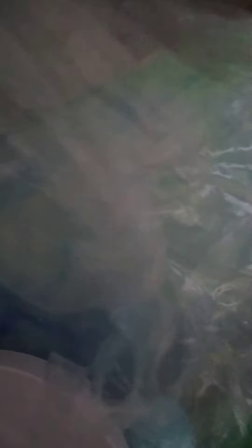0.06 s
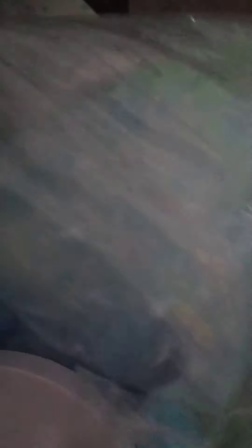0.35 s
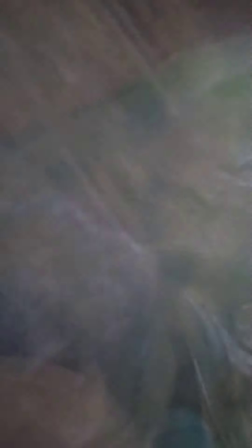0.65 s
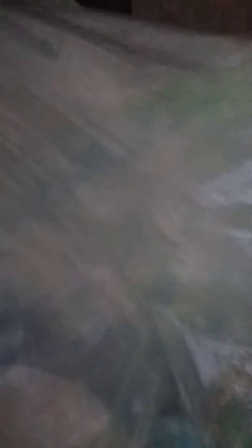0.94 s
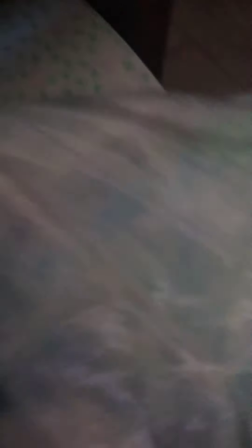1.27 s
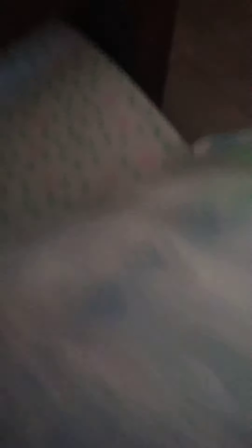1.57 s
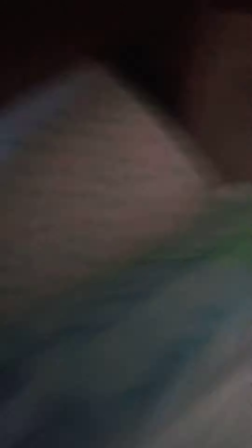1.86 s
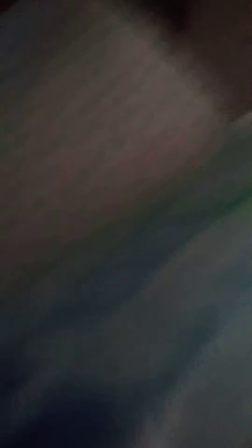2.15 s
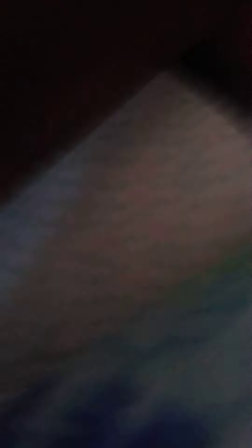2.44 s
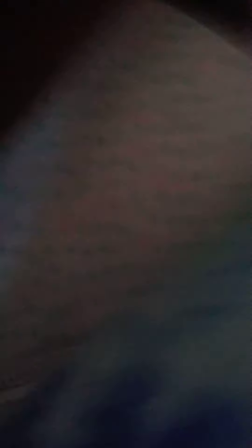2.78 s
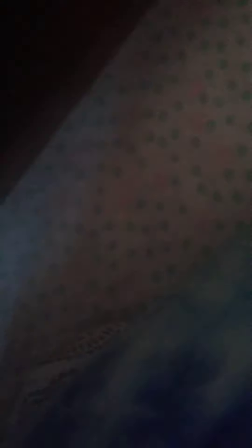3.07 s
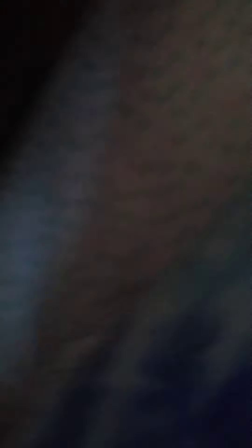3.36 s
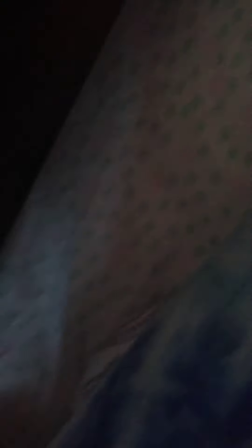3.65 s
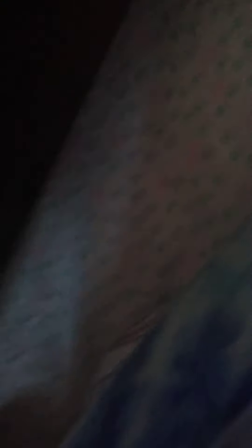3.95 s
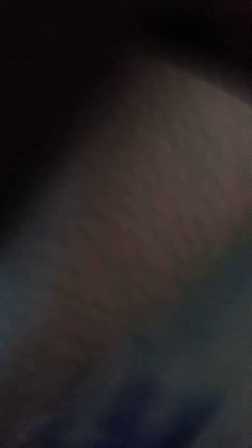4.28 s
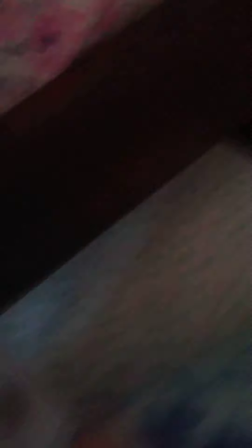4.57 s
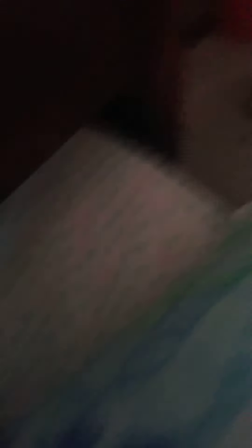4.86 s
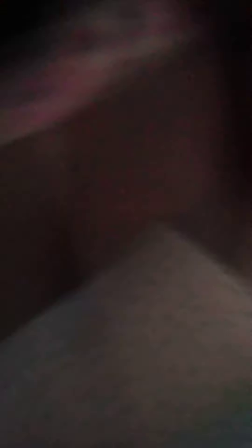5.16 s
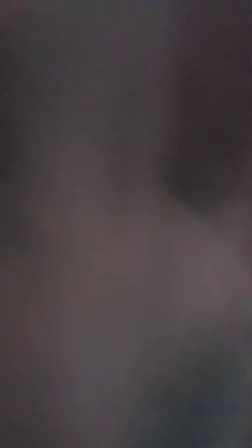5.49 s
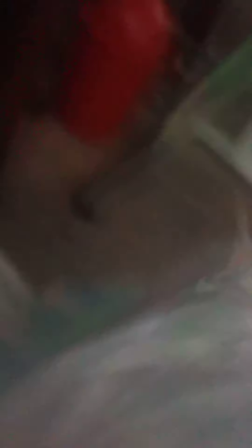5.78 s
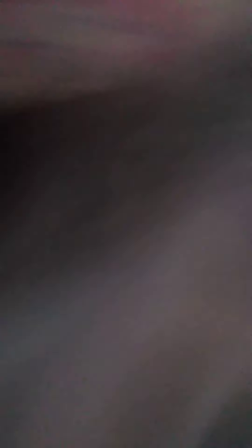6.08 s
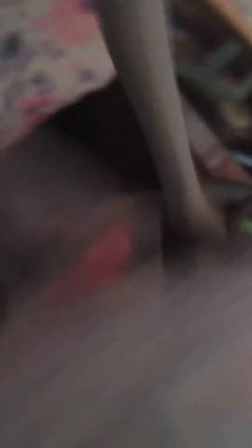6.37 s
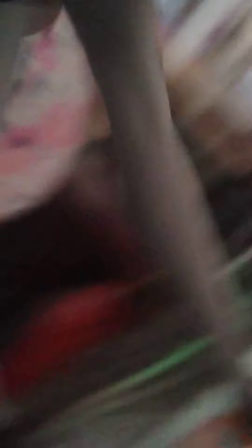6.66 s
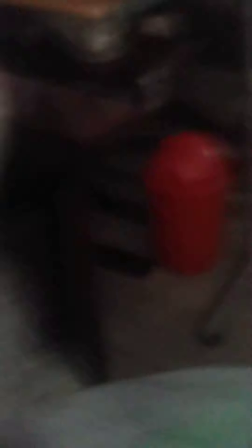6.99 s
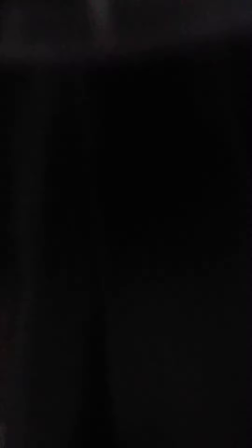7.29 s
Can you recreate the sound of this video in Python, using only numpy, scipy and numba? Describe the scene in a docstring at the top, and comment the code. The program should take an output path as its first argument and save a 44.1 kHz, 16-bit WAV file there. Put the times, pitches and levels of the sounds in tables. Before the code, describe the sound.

Thin plastic wrapping is gathered and squeezed right against a hand-held phone in a small, quiet room. It crinkles in uneven flurries with sharp snaps, while fingers rub and bump the case with low thuds. Midway the handling eases to a few faint ticks, then starts again. A heavy bump and two quick hollow knocks follow, and the plastic dies away to faint rustles.

```python
"""A small furnished room; thin plastic wrapping is gathered and pressed right against a hand-held phone.
Creases buckle in flurries of ticks, the panels between them flap, and film and fingers rub and bump
the case. The handling pauses in the middle and, after two hollow knocks, dies away to faint rustles.
The phone's two microphone ports are widened into stereo, with faint room tone behind."""
import sys
import numpy as np
from scipy import signal
from scipy.fft import rfft, irfft
from scipy.io import wavfile
from scipy.ndimage import uniform_filter1d
from numba import njit

SR = 44100
rng = np.random.default_rng(int(sys.argv[2]) if len(sys.argv) > 2 else 0)


def wav_record(signal):
    """Record a signal, one row per channel, as 16-bit PCM in the file named by sys.argv[1]."""
    frames = np.transpose(np.atleast_2d(signal))
    bounded = np.clip(frames, -1, 1)
    # unit amplitude maps onto the largest positive 16-bit level
    quanta = np.round(bounded * 32767).astype(np.int16)
    wavfile.write(sys.argv[1], SR, quanta)


N = 327663
TIME = np.arange(N) / SR

# light, unbroken stirring of the film in the hand: (time [s], crackle level [dB])
GRIP = [(0, -56), (.13, -61), (.3, -53), (.38, -58), (.6, -49.5), (.86, -60), (1.05, -50), (1.42, -46.5),
        (1.65, -55), (1.9, -50), (2.2, -57), (2.48, -53), (2.75, -50), (3.3, -67), (3.6, -78), (4.2, -81),
        (4.3, -58), (4.67, -63), (4.85, -50), (5.65, -47), (5.88, -65), (6.1, -62), (6.65, -68),
        (7.43, -62.5)]
# squeezes of the wrapping: (time [s], hold [s], crackle level [dB], flutter level [dB], rub level [dB])
SQUEEZES = [(.04, 0.041, -51, -43.5, -49), (.199, 0.04, -38.5, -36.5, -42.5),
            (0.259, 0.053, -42, -41.5, -47), (0.454, 0.14, -44, -39.5, -43.5),
            (0.699, 0.053, -36, -33.5, -37.5), (.795, .012, -43, -38, -45), (0.93, 0.034, -50, -37, -37),
            (0.981, 0.026, -35, -28.5, -37), (1.049, 0.035, -38, -34, -37),
            (1.139, 0.063, -48, -38.5, -40.5), (1.262, 0.026, -32, -28, -27.5),
            (1.319, 0.071, -43, -42.5, -47), (1.425, 0.042, -39, -34.5, -41),
            (1.545, 0.027, -47, -39.5, -42), (1.596, 0.015, -44, -43.5, -41),
            (1.669, 0.048, -45, -38.5, -40.5), (1.746, 0.018, -40, -35, -40),
            (1.855, 0.048, -36.5, -32.5, -36), (1.939, 0.042, -44, -40, -43),
            (2.002, 0.026, -35, -37.5, -47), (2.13, 0.039, -47, -50, -53), (2.245, 0.049, -46, -47, -49),
            (2.354, 0.057, -37, -39.5, -37), (2.625, 0.04, -43.5, -37.5, -41),
            (2.688, 0.028, -42, -41, -50), (2.823, 0.015, -30, -29.5, -32),
            (2.858, 0.02194, -32, -29.5, -34), (2.898, 0.006, -35, -36.5, -46),
            (3.031, 0.095, -51, -47.5, -49), (3.159, 0.015, -32, -30, -32), (3.177, .021, -28, -27.5, -32),
            (3.34, 0.058, -51, -55.5, -47), (3.43, 0.052, -54, -54, -54), (3.555, 0.012, -62, -52.5, -46.5),
            (3.775, 0.013, -60, -55, -43.5), (4.029, 0.031, -70, -58.5, -48.5),
            (4.144, .015, -71.5, -49.5, -51), (4.283, 0.021, -50, -51, -52),
            (4.319, 0.061, -42, -42.5, -40), (4.394, 0.038, -48, -46, -44), (4.584, 0.028, -54, -52, -49),
            (4.741, 0.0085, -50, -49, -40), (4.874, 0.026, -39, -41, -44), (4.991, 0.058, -51, -54, -53),
            (5.08, 0.054, -46, -51, -47), (5.219, 0.026, -35.5, -34.5, -33.5),
            (5.271, 0.034, -37, -33.5, -26.5), (5.417, 0.0213, -39, -28, -29),
            (5.585, 0.024, -44, -39, -38.5), (5.62, 0.014, -43, -33, -42), (5.765, 0.01, -43, -39.5, -48),
            (6.04, .04, -60, -58, -59), (6.11, .04, -50, -47, -50), (6.167, 0.037, -45, -44, -44.5),
            (6.369, 0.029, -59, -63, -51.5), (6.583, 0.064, -50, -49.5, -51.5),
            (6.757, 0.052, -49.5, -51, -46), (6.924, 0.03, -55, -48, -50), (7.06, 0.054, -56, -56, -65),
            (7.161, 0.046, -54, -54, -69), (7.272, 0.03, -49.5, -44.5, -61)]
# where the film folds along the phone: (time [s], position [0 middle, 1 ends])
FOLD_POSITION = [(0, 0.74), (1.7, 0.94), (2.3, .35), (4.2, .3), (5.2, .45), (5.7, 0.83), (6.5, 0.85),
                 (7.4, 0.53)]
# how much the film slides over itself rather than buckles: (time [s], share [0-1])
SLIDE = [(0, .25), (1.5, .15), (1.9, 0), (2.75, 0), (2.83, .4), (3.02, 0), (3.18, .45), (3.5, 0), (4.2, 0),
         (4.32, .7), (4.9, 0.44), (5.6, 0.46), (6.2, .5), (6.6, 0.08), (6.85, .4), (7.43, .55)]
# the loudest creases, nearest the microphones: (time [s], half-length of the tick run [s],
# tick level [dB], crease ring [Hz], panel pop level [dB], pop pitch [Hz], lean to the left [dB])
SNAPS = [(0.137, 0.0015, -46.5, 2300.0, -45, 1130, -5), (0.1943, 0.0036, -42.5, 2500.0, -37.5, 1050, -1),
         (0.2627, 0.002, -41, 11100.0, -40, 770.0, -7), (0.2713, 0.0018, -45, 7000, -49, 900, 1.5),
         (0.2784, 0.0014, -45.5, 5000, -54, 900, -1), (0.41, 0.0011, -47, 9000, -45, 800, -3),
         (0.437, 0.0016, -44, 9600.0, -42, 440.0, -4), (0.48, 0.0014, -53, 7000, -49, 800, 0),
         (0.501, 0.0016, -42, 3230, -50, 900, 1), (0.6408, 0.0024, -48, 3700.0, -39.5, 540.0, 2),
         (0.664, 0.001, -40, 7560, -39.5, 587, -2.5), (0.72, 0.0021, -40, 7000, -50, 900, -0.5),
         (0.7707, 0.0011, -38.5, 4912, -36, 1090.0, -3.5), (0.8115, 0.0012, -36, 7750, -50, 1000.0, -2.5),
         (0.861, 0.0014, -63, 2300.0, -39.5, 900, 3), (0.936, 0.0011, -38.5, 4430, -51, 656, -3.0),
         (1.124, 0.0013, -41.5, 6003, -40, 796.8, -1.5), (1.1857, 0.003, -35, 7005, -32.5, 829, -6.5),
         (1.2012, 0.0017, -40.5, 5000, -50, 799.4, 0.5), (1.2314, 0.0022, -44, 3220, -43, 654, -2.5),
         (1.262, 0.003, -46, 2996, -44, 800.4, 11), (1.337, 0.0016, -37.5, 2296, -41, 1525, -1.5),
         (1.3517, 0.00054, -34, 9600, -59, 919, -10.5), (1.359, 0.0019, -49, 8410, -37.5, 890.0, -1),
         (1.403, 0.0014, -38.5, 11400.0, -34.5, 659.4, -1.5), (1.516, 0.0016, -45, 2414, -36.5, 990, 2),
         (1.5963, 0.0026, -35.5, 7000.0, -35.5, 1001, -2.5), (1.6115, 0.001, -41, 8616, -50, 1089, -4),
         (1.697, 0.0014, -39.5, 5000, -41, 797.5, 0.5), (1.7096, 0.0011, -48, 3200, -39, 800, 0),
         (1.7497, 0.0018, -40, 3300, -38, 800, -1.5), (1.7796, 0.0015, -48, 4997, -42, 801.6, 0.5),
         (1.716, 0.0026, -37.5, 3000.0, -39, 642.2, -1.5), (1.8242, 0.0026, -47, 2300.0, -31, 583, 8.0),
         (1.8378, 0.0014, -42.5, 7000, -46, 805, 1), (1.845, 0.0015, -44, 4970, -42, 800, 3),
         (1.8603, 0.0019, -36.5, 4300.0, -41, 499.8, -0.5), (1.9003, 0.0017, -31.5, 2860, -35, 760.2, 2.5),
         (1.9226, 0.00088, -32, 8000, -40, 670.6, 2), (1.9587, 0.0014, -38, 5000, -43, 901.4, 0),
         (1.9912, 0.0018, -36, 9840, -38, 1039, 4.5), (2.01, 0.00097, -33, 2500.0, -30.5, 940.6, -5),
         (2.026, 0.0016, -31.5, 2580, -40, 797, -1.5), (2.056, 0.0011, -41, 9295, -42.5, 530.0, 3),
         (2.089, 0.00091, -46, 4100.0, -52, 541.4, 4), (2.0964, 0.0009, -37.5, 8150, -54, 1039, 2.5),
         (2.103, 0.0013, -43.5, 4895, -56, 670.6, 0), (2.1566, 0.00081, -35.5, 8840, -40.5, 587, 4.5),
         (2.1918, 0.0022, -48.0, 3006, -52, 712.4, 0.5), (2.244, 0.00076, -41, 4848, -44, 1082, 1),
         (2.288, 0.0026, -39.5, 3270, -50, 640, 1.5), (2.3315, 0.00097, -39, 2301, -42, 730.0, 1.5),
         (2.3405, 0.0022, -40, 2486, -40, 611.5, 1.5), (2.3516, 0.0012, -34.5, 8000, -51.0, 780.3, -5),
         (2.3748, 0.0015, -35.5, 9000, -45, 800, 0.5), (2.3965, 0.0017, -35, 5430, -39, 690.0, 0.5),
         (2.427, 0.00095, -39.5, 8976, -42, 800, -0.5), (2.4337, 0.0016, -33.5, 7500, -42, 600, 0),
         (2.507, 0.004, -44, 2299, -35.5, 550, 11), (2.5266, 0.0008, -43.5, 9620, -46, 726.5, -2),
         (2.569, 0.0014, -41.5, 2810, -44, 1281, 0.5), (2.5871, 0.0013, -45, 8000, -38, 802.5, 0),
         (2.6043, 0.00084, -38, 3502, -39, 421, 2.5), (2.6126, 0.0013, -44, 10000, -41, 800, 1.5),
         (2.6482, 0.0018, -37.5, 7500, -40, 800, -1), (2.6761, 0.0013, -32, 10220, -43, 911, 0),
         (2.684, 0.00099, -34, 5970, -39.5, 900, -0.5), (2.6932, 0.0012, -34, 4000, -41, 895, 1),
         (2.7083, 0.00095, -38, 6960, -48, 900, -3), (2.7177, 0.0014, -37, 8000, -45, 899, -2),
         (2.746, 0.0008, -45, 11000, -52, 900, 1), (2.782, 0.00087, -45, 11000, -52, 900.4, 1),
         (2.7625, 0.0024, -40, 3198, -40.5, 780.0, 0.5), (2.799, 0.0014, -46, 4500, -45, 801.5, 3),
         (2.831, 0.0032, -34, 3300, -28, 1000, 1), (2.8923, 0.00049, -33, 7800, -26.5, 1181, 4),
         (2.9881, 0.0014, -49.5, 5487, -55, 760, 2), (3.01, 0.0011, -48, 2284, -58, 917, -1),
         (3.027, 0.0012, -47, 8500, -57, 900, 0), (3.0337, 0.0012, -44.5, 7500, -59, 895.5, 1),
         (3.0438, 0.001, -42.5, 3000, -53, 1100, 1), (3.0788, 0.0015, -42.5, 7004, -58, 900, 0.5),
         (3.0993, 0.0012, -50, 8500, -46, 901.3, -2.5), (3.1276, 0.0011, -39.0, 9496, -35.5, 640.5, 5),
         (3.1396, 0.0014, -39, 5500, -41, 900, -0.5), (3.157, 0.0027, -29.5, 5001, -30.5, 950, 1.5),
         (3.195, 0.003, -27.5, 3000, -27, 760, -0.5), (3.2864, 0.0011, -48, 7000.0, -50, 958, 4.5),
         (3.3813, 0.0014, -50, 6020, -52, 901.7, 1), (3.449, 0.0014, -51, 6980, -58, 900, 0),
         (3.47, 0.0012, -51.5, 7000, -59, 900.5, 0.5), (3.5184, 0.00069, -50, 6154, -51, 1002, -1.5),
         (3.5597, 0.00069, -46.5, 10290, -47, 710, -4), (3.6103, 0.00094, -55, 10150, -54, 699, -2),
         (3.7382, 0.00094, -39.5, 10070, -48, 936, 2), (3.7597, 0.0013, -44.5, 5210, -54, 899, 3.5),
         (3.776, 0.0008, -36.5, 9210, -41.5, 620.2, 4.5), (3.7844, 0.0019, -51, 4410, -47.5, 750, 5),
         (3.8116, 0.001, -60, 5000, -58, 900, 0), (3.825, 0.001, -62, 4020, -53.5, 800, 4),
         (3.839, 0.00094, -64, 8070, -62, 900, 2), (3.851, 0.00098, -47.5, 4400, -52, 779, 0),
         (3.869, 0.00078, -58, 3196, -58, 1100, 3.5), (3.969, 0.0013, -52.5, 2305, -57, 581.4, 5),
         (3.974, 0.0008, -52, 5000, -58, 601, 4), (3.9874, 0.0016, -55.5, 2296, -70, 959, 3),
         (4.0096, 0.00091, -43, 4810, -52, 854, 2), (4.0359, 0.00099, -51.5, 2492, -52, 625, 5.5),
         (4.1853, 0.00055, -50.5, 6675, -64, 775, 5.5), (4.229, 0.00091, -55, 3198, -52, 1054, 1),
         (4.246, 0.0013, -50.5, 2992, -45, 1225, 0.0), (4.3339, 0.0017, -38, 5013, -49, 902, 0.5),
         (4.3746, 0.0017, -44, 3200, -42, 901.6, 1.5), (4.4981, 0.0015, -47, 2733, -53, 636.7, 1),
         (4.576, 0.00054, -46.5, 9720, -62, 498, 5.5), (4.684, 0.0012, -43.5, 7950, -46, 849, 8.5),
         (4.732, 0.0003, -34, 3092, -26, 948, -8), (4.7395, 0.0018, -46, 5980, -39, 703, 0),
         (4.8017, 0.0013, -48.5, 3715, -40, 600.0, 10.5), (4.8273, 0.002, -52, 3594, -60, 1123, 2.5),
         (4.9372, 0.00064, -34.5, 8985, -35, 1369, 3.5), (4.9452, 0.0022, -53, 3102, -40.5, 1183, 10),
         (4.9541, 0.0013, -46, 5005, -55, 899, -2), (4.9917, 0.0012, -46, 3196, -48, 901, 6),
         (5.008, 0.0013, -52, 3595, -44.5, 722, 9.5), (5.0441, 0.0023, -48.0, 2305, -38, 1345, 4),
         (5.052, 0.00078, -45, 10800, -39.5, 730.0, 11.5), (5.086, 0.0011, -48, 3598, -45, 878.6, 2),
         (5.114, 0.0015, -40, 2407, -43, 1343, 0), (5.1409, 0.00099, -44, 10300, -39, 1256, 5.5),
         (5.1868, 0.00087, -40, 2597, -41, 497.5, 5), (5.2838, 0.0018, -34.5, 2898, -32.5, 700.4, -1.5),
         (5.349, 0.001, -45, 8188, -50.5, 682, 0), (5.3653, 0.00075, -46, 2304, -44, 758.8, 2),
         (5.528, 0.0011, -37.5, 10500, -45, 960.6, -3), (5.5356, 0.0014, -41, 8000, -46, 900.3, -0.5),
         (5.5408, 0.0014, -43, 8000, -47, 900.4, 1), (5.661, 0.00057, -31, 5513, -26, 764.5, -6.5),
         (5.6717, 0.00089, -32.5, 3000, -25.5, 1097, -4), (5.6808, 0.0015, -36, 5474, -35, 1000, -2.5),
         (5.6873, 0.0015, -46, 3287, -39, 900, -5), (5.698, 0.002, -45, 3300, -44, 901, -2),
         (5.736, 0.0026, -43, 13450, -39, 1004, -11), (5.745, 0.00075, -37, 2592, -47, 911, -3.5),
         (5.766, 0.0018, -35, 2820, -34, 700, -3), (5.777, 0.0014, -40.5, 6040, -44, 900, 0),
         (5.833, 0.0024, -58, 2300.0, -47, 950, 10.5), (6.0307, 0.00071, -53, 3606, -46.5, 693, 5),
         (6.0866, 0.0013, -48, 3508, -50, 1099, 0.5), (6.1367, 0.0014, -45, 6010, -57, 897.6, -1),
         (6.2465, 0.0012, -57, 5013, -59, 902.3, -1), (6.3692, 0.00091, -46, 2306, -49, 518, -6.5),
         (6.386, 0.0012, -43, 10600, -45.5, 1001, -2), (6.4204, 0.0024, -49.5, 2286, -58, 547, -1),
         (6.5741, 0.001366, -54, 3985, -52, 901, 0), (6.581, 0.0015, -42, 2490, -55, 902, -4),
         (6.613, 0.0013, -60, 4988, -59, 900, -3), (6.6725, 0.00078, -50, 4094, -56, 1085, -4.5),
         (6.704, 0.0014, -57.5, 3290, -53, 1099, 0.5), (6.7488, 0.0012, -54, 4692, -50, 788, -5.5),
         (6.777, 0.0008, -43, 11160, -57, 985, 4), (6.8318, 0.0012, -46.5, 9945, -52, 862, 0.5),
         (6.9946, 0.0011, -52.5, 6288, -56.5, 1006, 3)]
# soft touches on the case: (time [s], level [dB], nominal pitch [Hz])
BUMPS = [(.974, -19.5, 88.1), (1.065, -19, 131), (1.255, -20, 101), (1.762, -27, 145.2),
         (2.503, -29, 149.4), (3.163, -22, 140.1), (3.192, -17.5, 114.9), (3.34, -33, 133.5),
         (3.776, -50, 133.7), (4.15, -32, 149.7), (4.375, -29, 132), (4.733, -31, 183.7),
         (5.266, -17, 154.6), (5.274, -28, 234.9), (5.2813, -8.5, 88.04), (5.284, -23, 230),
         (5.299, -22, 85), (5.436, -29, 140.6), (5.763, -22.5, 194), (5.771, -28, 126), (6.175, -37, 180),
         (6.783, -41, 190)]
# something hard inside the wrapping, its first knock a double hit: (time [s], level [dB], pitch [Hz])
KNOCKS = [(5.668, -14.5, 790.8), (5.672, -24, 889.6), (5.762, -13.5, 676)]
# modes of that hollow body: (frequency [multiple of the pitch], level [dB], decay by 60 dB [s])
KNOCK_MODES = [(.5, -13.5, 0.022), (.78, -7, 0.0061), (1, -1, 0.017), (1.55, -4, .012), (1.95, -17, .007)]
# tone colour of each source at the microphones: (frequency [Hz], gain [dB])
ROOM_TONE_EQ = [(20, -5), (60, 6), (160, 20), (600, 0.5), (1500, 0.5), (4000, -4), (12000, -9),
                (16000, -26)]
CREASE_EQ = [(700, -13), (1400, 1.5), (2200, 1), (3000, 0), (4200, -2), (6000, -2), (9000, 1), (12000, 3.5),
             (14000, -1.5), (15500, -35)]
PANEL_EQ = [(100, -22), (250, 5), (400, 3.5), (700, 0), (1000, 0.5), (1400, 0.5), (1900, 3), (2800, 1.5),
            (6000, -36.5)]
RUB_EQ = [(20, -33), (40, -13.5), (70, -0.5), (110, 0), (160, 1.5), (250, -6.5), (400, -24.5), (900, -57)]
CRACK_EQ = [(500, -25), (1800, 8), (12000, 1), (15500, -5)]
REVERB_EQ = [(100, 13.0), (500, 5.0), (3000, 9.0), (14000, -2.0)]
BUMP_EQ = [(20, -5), (45, -12), (80, -6.5), (400, 4.0)]

PORT_LAG_S = .00036  # travel time from one microphone port to the other


def undb(db):
    """Decibels to gain."""
    return 10 ** (np.asarray(db) / 20)


def unit(x):
    """Scale to rms 1."""
    return x / np.sqrt(np.mean(x ** 2))


def decay(t, t60):
    """Envelope that falls 60 dB in t60 seconds."""
    return np.exp(-np.log(1000) * t / t60)


def curve(points, t=TIME):
    """Read a (time, value) table at times t."""
    return np.interp(t, *np.transpose(points))


def convolve(x, response):
    """Pass both channels through an impulse response, keeping their length."""
    return signal.oaconvolve(x, response, axes=1)[:, :x.shape[1]]


def colour(x, eq, size=2048):
    """Minimum-phase filter with the given (Hz, dB) shape, so attacks stay sharp."""
    hz, db = np.transpose(eq)
    bin_hz = np.arange(size // 2 + 1) * SR / size
    log_gain = np.log(undb(np.interp(np.log(bin_hz + 1), np.log(hz), db)))
    cepstrum = irfft(log_gain)
    cepstrum[1:size // 2] *= 2
    cepstrum[size // 2 + 1:] = 0
    return convolve(x, irfft(np.exp(rfft(cepstrum)))[None])


def add(out, time_s, sound):
    """Mix a two-port sound in at time_s."""
    i = int(np.clip(time_s * SR, 0, N - 1))
    out[:, i:i + sound.shape[1]] += sound[:, :N - i]


def steady(x, span_s):
    """Hold the running level at 1 while the fine grain stays."""
    size = int(span_s * SR)
    power = uniform_filter1d(uniform_filter1d(np.mean(x ** 2, axis=0), size), size)
    return x / np.sqrt(np.abs(power) + 1e-4 * power.mean())


@njit
def damped_sines(length, start, hz, cycles, size, phase):
    """Sum of sines that each fall 60 dB over `cycles`; start is in fractional samples."""
    out = np.zeros(length)
    for k in range(len(start)):
        step = 2j * np.pi * hz[k] / SR - 6.9 * hz[k] / (cycles * SR)
        first = int(start[k]) + 1
        phasor = size[k] * np.exp(step * (first - start[k]) + 1j * phase[k])
        turn = np.exp(step)
        for i in range(max(first, 0), min(first + int(cycles * SR / hz[k]), length)):
            out[i] += phasor.imag
            phasor *= turn
    return out


def room_tone(level_db=-65.5):
    """The air of the room: faint, steady noise, separate at each port."""
    return undb(level_db) * unit(colour(rng.standard_normal((2, N)), ROOM_TONE_EQ))


def squeeze_level(layer, grip_db, attack_s=.011, release_s=.011, ease_db_per_s=15):
    """Level [dB] of one layer: over the light grip, each squeeze builds, eases a little and lets go."""
    column = ("crackle", "flutter", "rub").index(layer)
    power = undb(grip_db) ** 2
    for time_s, hold_s, *levels in SQUEEZES:
        span = slice(max(int((time_s - .1) * SR), 0), int((time_s + .5) * SR))
        t = TIME[span] - time_s
        held_db = levels[column] - ease_db_per_s * np.clip(t, 0, hold_s)
        press = np.exp(np.minimum(t, 0) / attack_s) * undb(held_db)
        after = np.maximum(t - hold_s, 0)
        settling = undb(-24) * np.exp(-after / .054)  # the film goes on stirring
        let_go = np.maximum(np.exp(-after / release_s), settling)
        power[span] += (press * let_go) ** 2
    return 10 * np.log10(power)


def flicks(times, hz, size, side, cycles, phase_spread, length=N):
    """Flicks of film ring briefly, earlier and louder at the nearer port (side: -1 right, 1 left)."""
    hz = np.clip(hz, 120, 15500)
    polarity = rng.choice([0, np.pi], len(times))
    ports = []
    for port in (1, -1):
        start = (times - port * side * PORT_LAG_S / 2) * SR
        gain = size * undb(port * side * 3.6) * np.sqrt(hz)
        phase = polarity + phase_spread * rng.standard_normal(len(times))
        ports.append(damped_sines(length, start, hz, float(cycles), gain, phase))
    return np.array(ports)


def sheet_ring(x, t60, tail_db, shapes=1, shape_s=.05):
    """Flicks spread through the crumpled sheet and return as a faint ring, one for each shape it takes."""
    t = np.arange(1536) / SR
    shape = (np.arange(x.shape[1]) / (shape_s * SR)).astype(int) % shapes
    out = x
    for k in range(shapes):
        tail = rng.standard_normal((2, len(t))) * decay(t, t60) * (t > .001)
        share = uniform_filter1d((shape == k) * 1., size=64)
        out = out + undb(tail_db) * convolve(x * share, unit(tail) / np.sqrt(len(t)))
    return out


def crinkle(crackle_db, flutter_db, tick_hz=4900, flap_hz=680, folds_per_s=70, avalanche=8):
    """Creases buckle, more often under pressure, in tiny avalanches pitched by the fold they run along."""
    # sliding film makes more and more even catches, which merge into a soft rustle
    slide = curve(SLIDE)
    per_s = 1300 * undb(.55 * (crackle_db + 45)) * (1 + 3.5 * slide)
    at = np.flatnonzero(rng.random(N) < per_s / SR)
    spread_db = 5 * (1 - .6 * slide[at])
    size = undb(spread_db * np.minimum(rng.exponential(size=N)[at], 3.6))
    side = rng.choice([-1, 1], N)[at] * (curve(FOLD_POSITION)[at] + .25 * rng.standard_normal(N)[at])
    stiffness = rng.standard_normal(N)[at]
    fold_pitches = np.clip(rng.standard_normal(N), -1.5, 1.5)
    fold = fold_pitches[np.cumsum(rng.random(N) < folds_per_s / SR)[at]]  # jumps from fold to fold
    times, size, side, stiffness, fold = np.repeat([at / SR, size, side, stiffness, fold], avalanche, 1)
    jitter, tick_detune, flap_detune, share = rng.standard_normal((len(size), 4)).T
    times = times + .00075 * jitter
    tick_octaves = .55 * fold + .55 * stiffness + .3 * tick_detune
    flap_octaves = .29 * fold + .59 * stiffness + .6 * flap_detune
    ticks = flicks(times, tick_hz * 2 ** tick_octaves, size * share, side, cycles=8, phase_spread=.63)
    flaps = flicks(times, flap_hz * 2 ** flap_octaves, size ** .97, side, cycles=6.6, phase_spread=.95)
    ticks = sheet_ring(colour(ticks, CREASE_EQ), t60=.084, tail_db=-10.5, shapes=7)
    flaps = sheet_ring(colour(flaps, PANEL_EQ), t60=.025, tail_db=-8.5, shapes=7)
    crackle = steady(ticks, span_s=.036) * undb(crackle_db - 1.9)
    flutter = steady(flaps, span_s=.036) * undb(flutter_db - 4.5)
    return crackle + flutter


def case_rubbing(rub_db, slips_per_s=320, spread_db=4):
    """Film and fingers catch and slip on the case: low handling noise, separate at each port."""
    slips = (rng.random((2, N)) < slips_per_s / SR) * rng.standard_normal((2, N))
    slips *= undb(spread_db * rng.exponential(size=(2, N)))
    return steady(colour(slips, RUB_EQ), span_s=.051) * undb(rub_db)


def room_reverb(x, t60=.25, wet_db=-19):
    """The furnished room returns a short, dull wash."""
    t = np.arange(SR // 2) / SR
    tail = rng.standard_normal((2, len(t))) * decay(t, t60) * (t > .006)
    tail = colour(tail, REVERB_EQ)
    return undb(wet_db) * convolve(x, unit(tail) / np.sqrt(len(t)))


def crease_snaps(rows, lead_s=.004, tick_hz=5700, ticks=10, length=2048):
    """A stiff crease flips: one hard, ringing crack amid lesser ticks, and the pop of the panel behind."""
    out = np.zeros((2, N))
    scale = np.sqrt(.005 * SR / length)  # levels are rms over 5 ms
    crack_at = np.array([lead_s + PORT_LAG_S / 2])  # leaves time for ticks ahead of the crack
    spacing = np.linspace(0, 1, ticks) ** 1.2 * 2 - .8
    for time_s, half_run_s, tick_db, ring_hz, pop_db, pop_hz, lean_db in rows:
        tick_at = crack_at + np.maximum(half_run_s * spacing, -lead_s)
        strength = undb(.74 * rng.standard_normal(ticks))
        octaves = rng.permutation(np.linspace(-1, 1, ticks))
        side = np.clip(lean_db / 6 + .25 * rng.standard_normal(ticks), -1, 1)
        run_hz = tick_hz * (ring_hz / tick_hz) ** .3 * 2 ** (.77 * octaves)  # partly follows the ring
        crack = flicks(crack_at, np.array([ring_hz]), np.ones(1), side[:1],
                       cycles=.0026 * ring_hz, phase_spread=.65, length=length)
        run = flicks(tick_at, run_hz, strength, side, cycles=2.8, phase_spread=.39, length=length)
        pop = flicks(np.maximum(tick_at, crack_at), pop_hz * 2 ** (.81 * octaves), strength, side,
                     cycles=5.4, phase_spread=1.0, length=length)
        crease = undb(-4.5) * unit(colour(crack, CRACK_EQ)) + undb(-1.5) * unit(colour(run, CREASE_EQ))
        crease = sheet_ring(crease, t60=.018, tail_db=-12)
        panel = sheet_ring(colour(pop, PANEL_EQ), t60=.032, tail_db=-10)
        snap = undb(tick_db + 1.5) * unit(crease) + undb(pop_db - 1.5) * unit(panel)
        add(out, time_s - lead_s, scale * snap)
    return out


def stray_snaps(per_s=3, above_grip_db=7.5, half_run_s=.0012, count=120):
    """Lesser creases let go at random, a little louder than the light stirring; rows as in SNAPS."""
    times = np.cumsum(rng.exponential(size=count)) / per_s
    loudness, panel, pitch, side, stiffness = rng.standard_normal((count, 5)).T
    tick_db = curve(GRIP, times) + above_grip_db + loudness
    pop_db = tick_db - 5 + panel
    ring_hz, pop_hz = 4800 * 2 ** (.82 * stiffness), 850 * 2 ** (.5 * pitch)
    columns = [times, np.full(count, half_run_s), tick_db, ring_hz, pop_db, pop_hz, 3 * side]
    return [row for row in np.transpose(columns) if row[0] < TIME[-1]]


def case_bumps(cycles=10.5, right_gain=-.15):
    """A touch near the left port makes the case thud for a few cycles."""
    out, t = np.zeros((2, N)), np.arange(6000) / SR
    scale = np.sqrt(.005 * SR / len(t))
    for time_s, db, hz in BUMPS:
        sagging_hz = hz * (.65 + .5 * np.exp(-t / .015))  # the contact softens as the touch spreads
        envelope = decay(t, cycles / hz) * (1 - np.exp(-t / .0004))
        thud = np.sin(2 * np.pi * np.cumsum(sagging_hz) / SR) * envelope
        add(out, time_s, undb(db) * scale * unit(np.outer([1, right_gain], thud)))
    return colour(out, BUMP_EQ)


def hollow_knocks(left_db=-2):
    """Each knock rings a hollow body briefly and reaches the right port first."""
    out, clock = np.zeros((2, N)), np.arange(4000) / SR
    t = np.maximum(np.array([clock - PORT_LAG_S, clock]), 0)
    for time_s, db, hz in KNOCKS:
        body = sum(undb(mode_db) * decay(t, t60) * np.sin(2 * np.pi * ratio * hz * t)
                   for ratio, mode_db, t60 in KNOCK_MODES)
        add(out, time_s, undb(db + np.array([[left_db], [0]])) * body)
    return out


def scene():
    """The wrapping at point-blank range and the room behind it, as they reach the two ports."""
    grip_db = curve(GRIP)
    firmer_db = grip_db + 55  # panels and case follow the grip less steeply than the creases
    crackle_db = squeeze_level("crackle", grip_db)
    flutter_db = squeeze_level("flutter", -49 + .63 * firmer_db)
    rub_db = squeeze_level("rub", -52.5 + .57 * firmer_db, release_s=.022)
    rustle = crinkle(crackle_db, flutter_db)
    snaps = crease_snaps(SNAPS + stray_snaps())
    air = room_tone()
    reverb = room_reverb(rustle + undb(-9.5) * snaps)  # the snaps are closest, so they carry less room
    return air + rustle + case_rubbing(rub_db) + reverb + snaps + case_bumps() + hollow_knocks()


def record(dry, cross_gain=.76, cross_hz=6000, balance_db=1.0, top_hz=15200):
    """The phone widens the stereo by subtracting a late, dull copy of the other port, then cuts the top."""
    dull = signal.firwin(13, cross_hz, window=("kaiser", 4), fs=SR)
    late_and_dull = np.concatenate([np.zeros(15), dull])
    wide = dry - cross_gain * signal.lfilter(late_and_dull, 1, dry[::-1])
    wide *= undb(np.array([[balance_db], [-balance_db]]) / 2)
    top_cut = signal.ellip(8, .2, 70, top_hz, fs=SR, output="sos")
    return signal.sosfilt(top_cut, wide)


dry = scene()
out = record(dry)
wav_record(out)
```